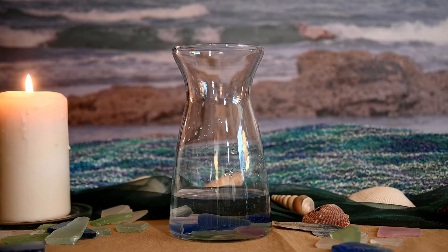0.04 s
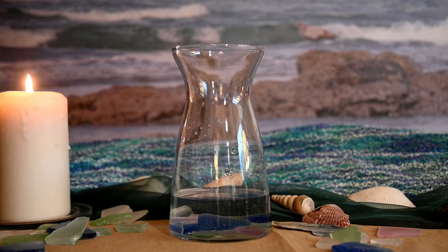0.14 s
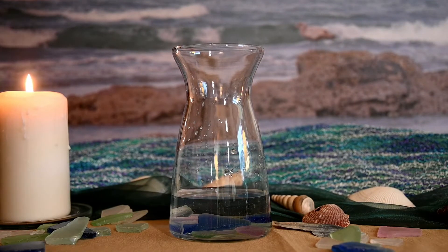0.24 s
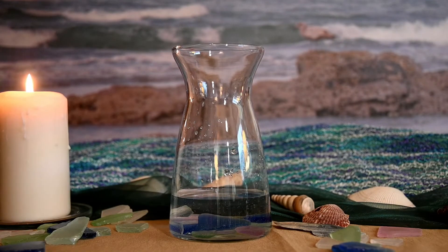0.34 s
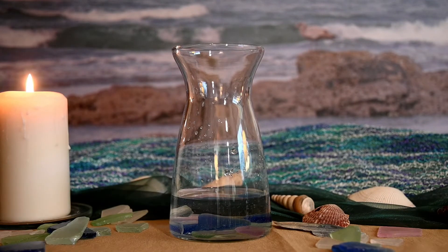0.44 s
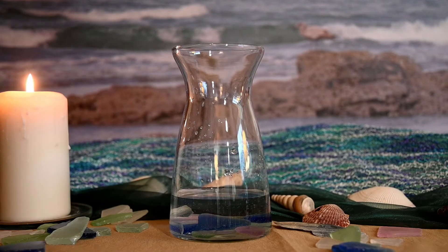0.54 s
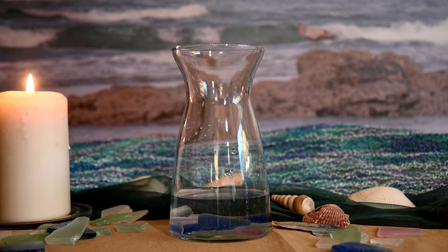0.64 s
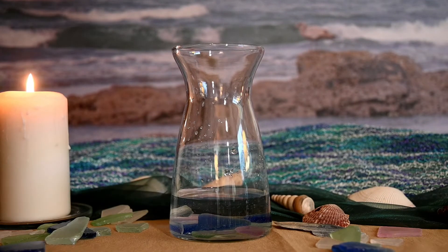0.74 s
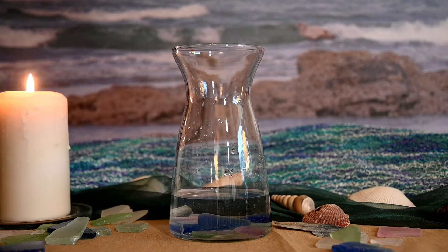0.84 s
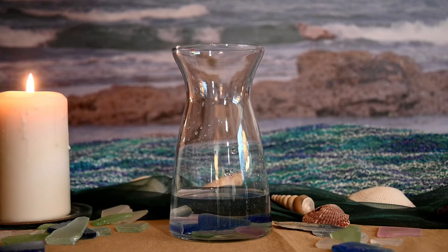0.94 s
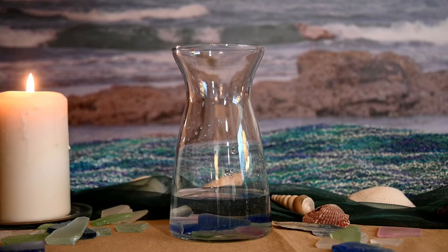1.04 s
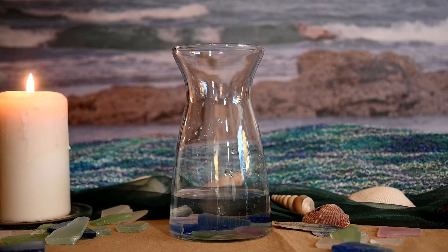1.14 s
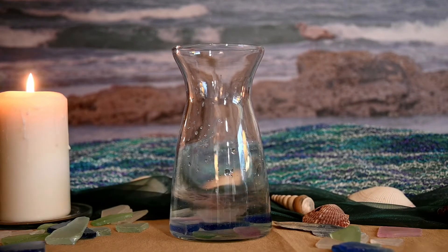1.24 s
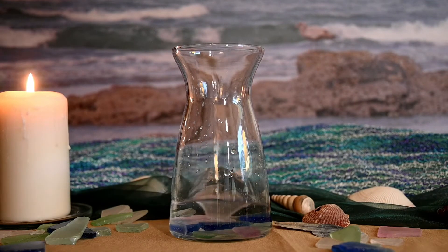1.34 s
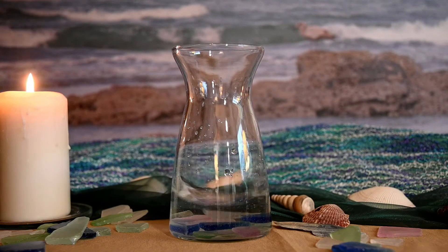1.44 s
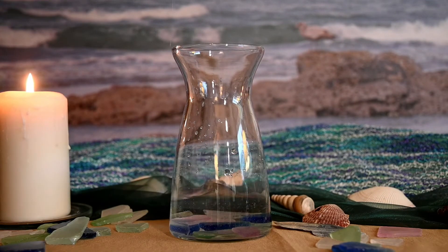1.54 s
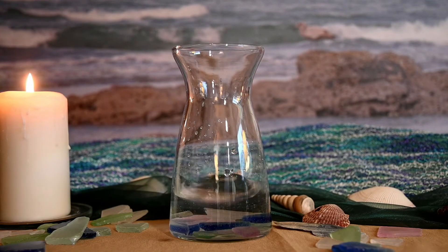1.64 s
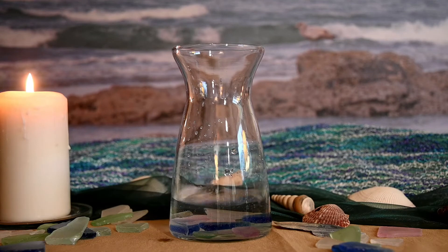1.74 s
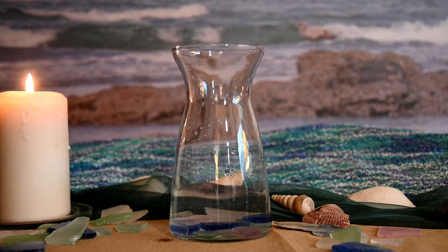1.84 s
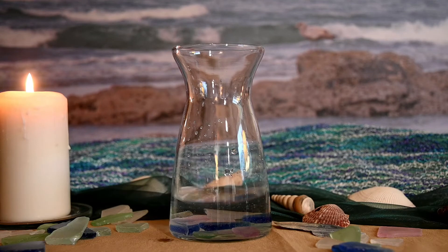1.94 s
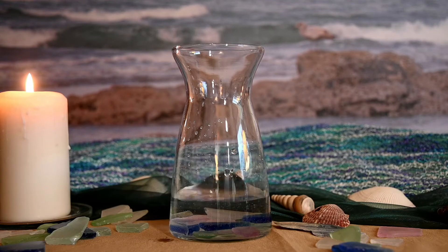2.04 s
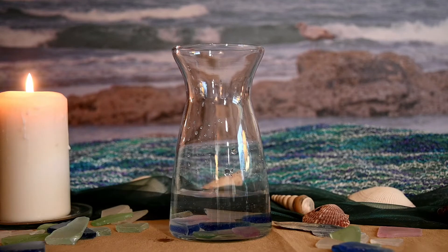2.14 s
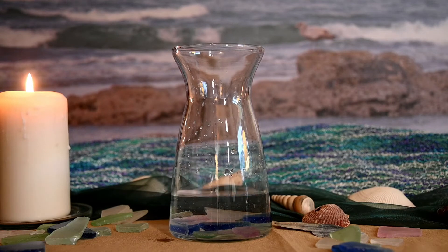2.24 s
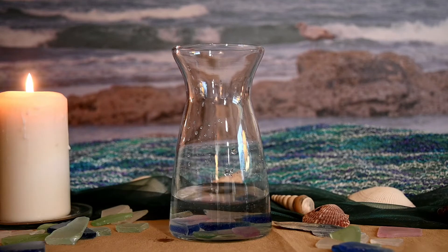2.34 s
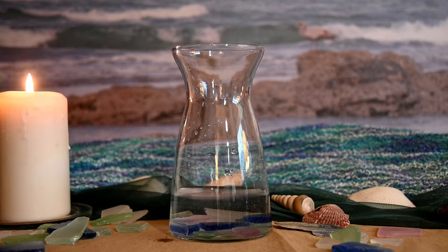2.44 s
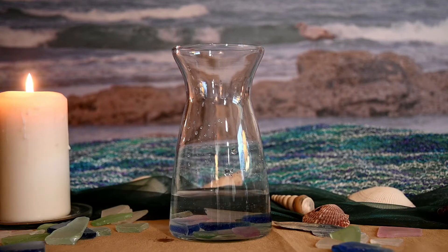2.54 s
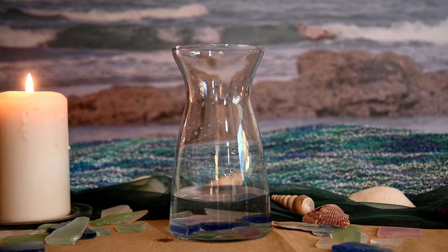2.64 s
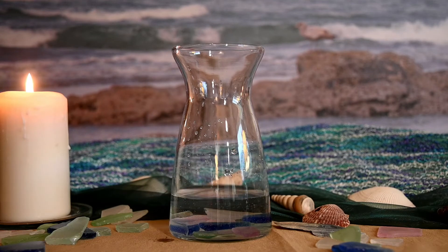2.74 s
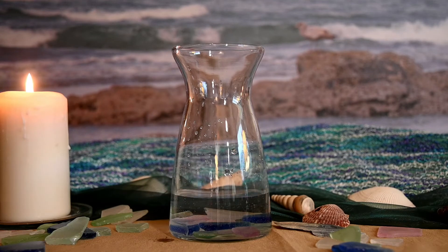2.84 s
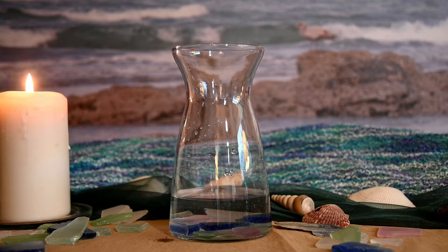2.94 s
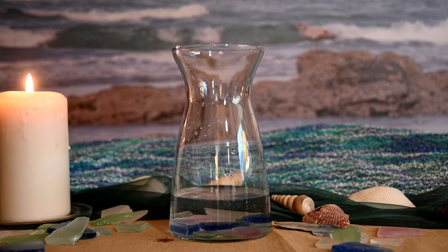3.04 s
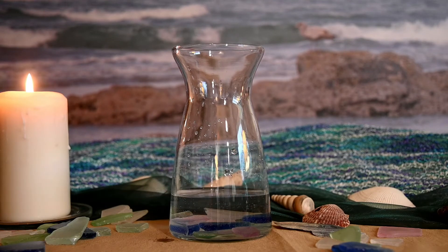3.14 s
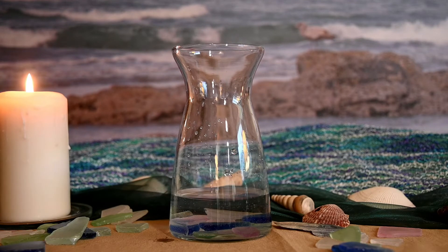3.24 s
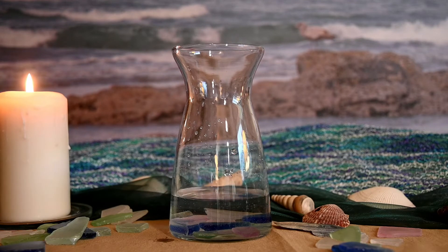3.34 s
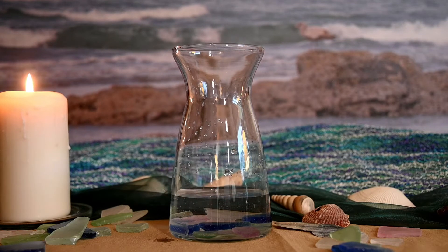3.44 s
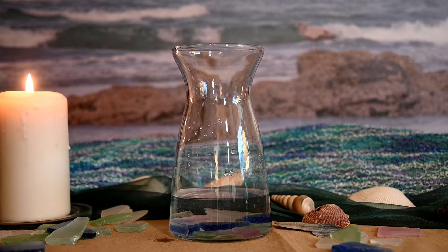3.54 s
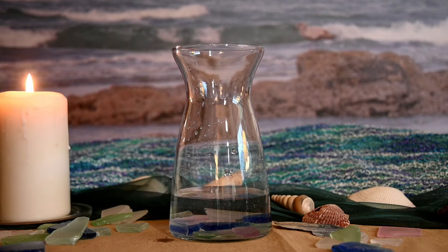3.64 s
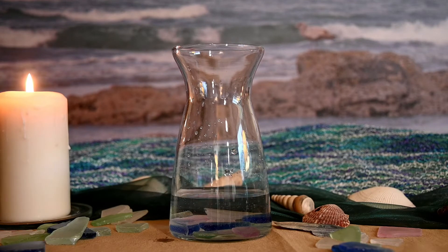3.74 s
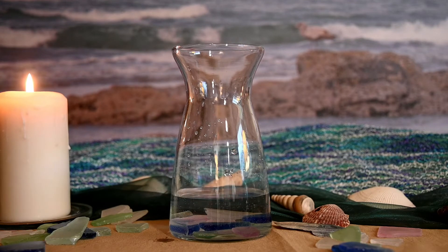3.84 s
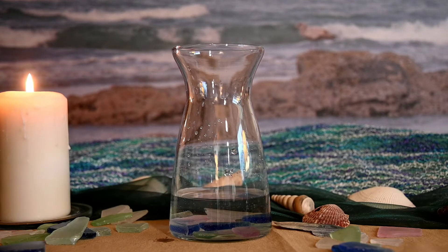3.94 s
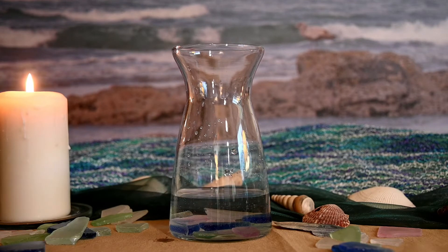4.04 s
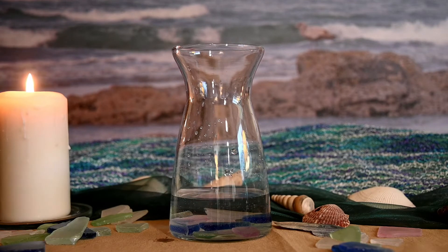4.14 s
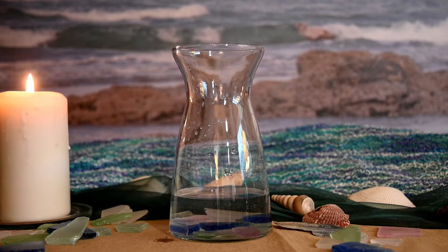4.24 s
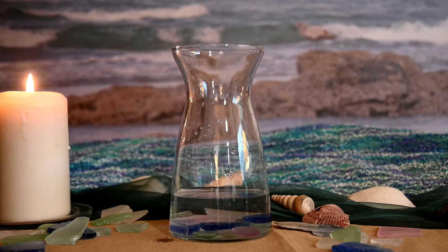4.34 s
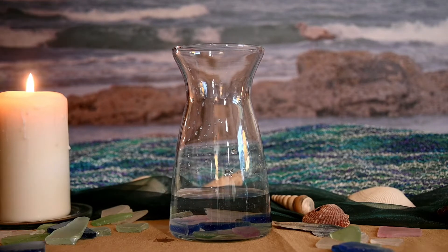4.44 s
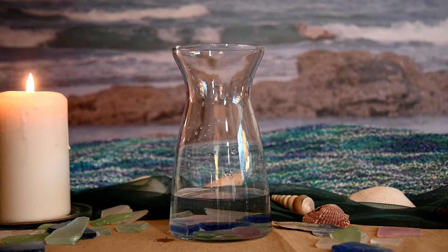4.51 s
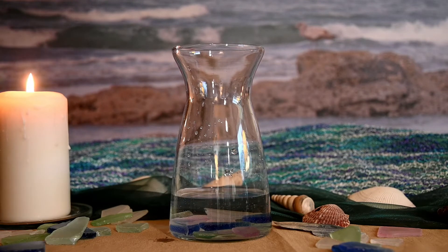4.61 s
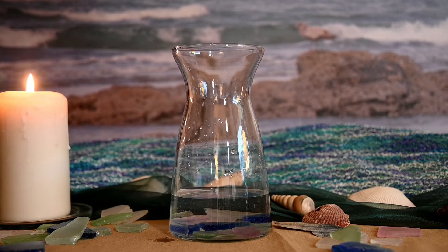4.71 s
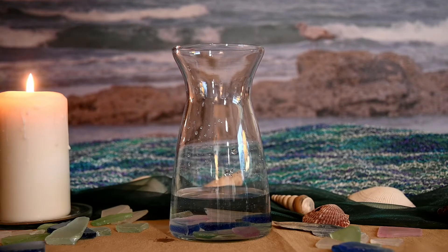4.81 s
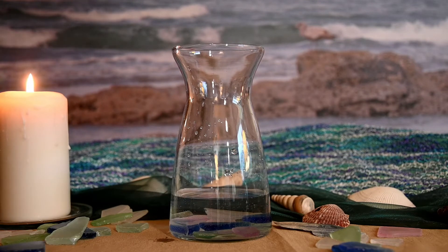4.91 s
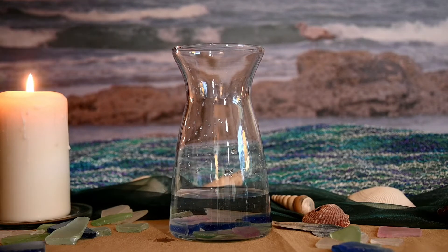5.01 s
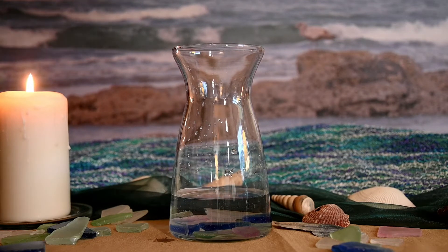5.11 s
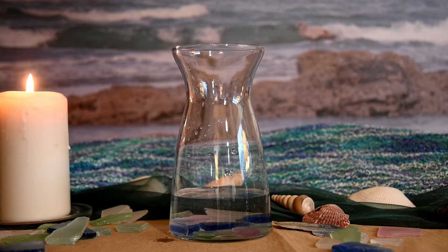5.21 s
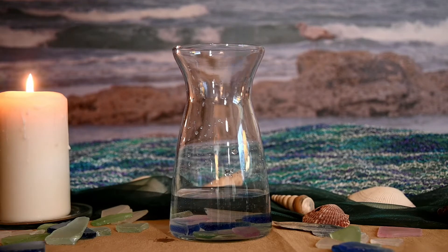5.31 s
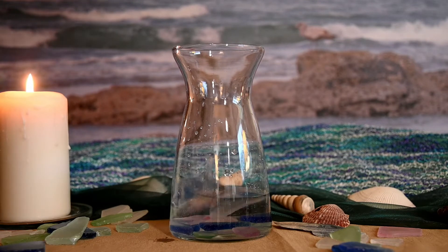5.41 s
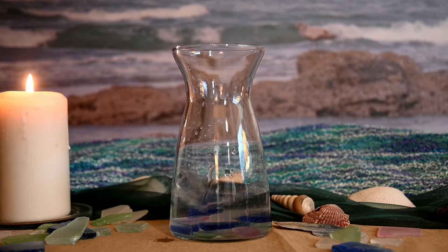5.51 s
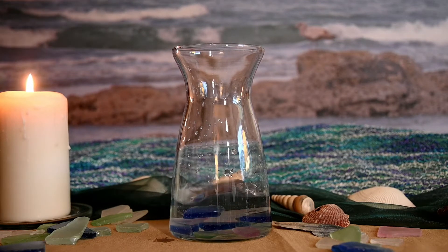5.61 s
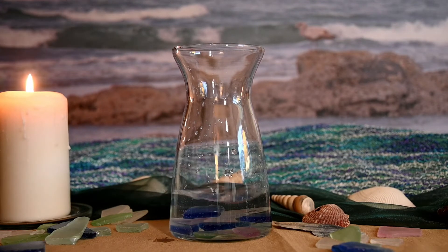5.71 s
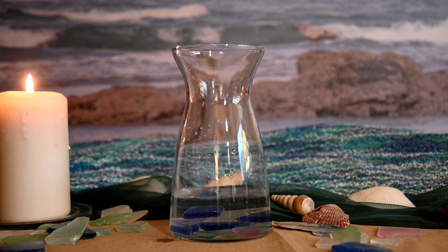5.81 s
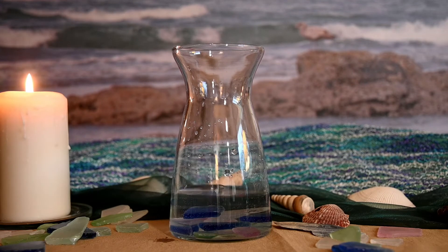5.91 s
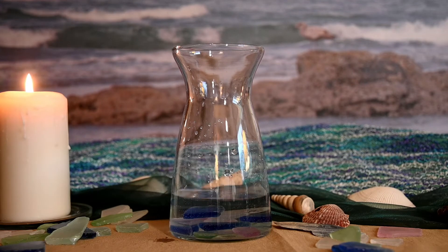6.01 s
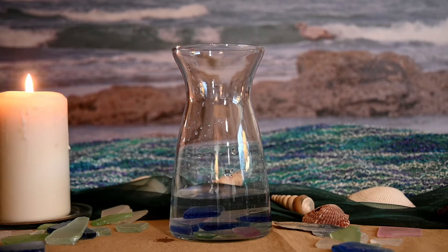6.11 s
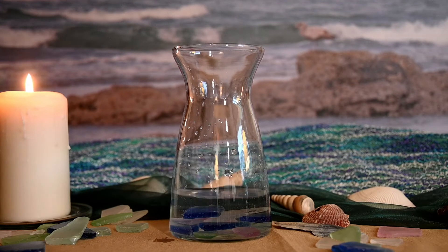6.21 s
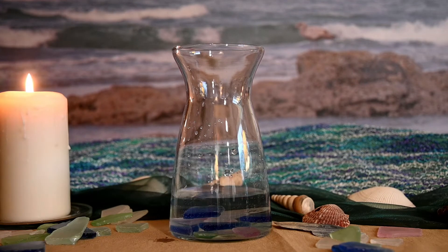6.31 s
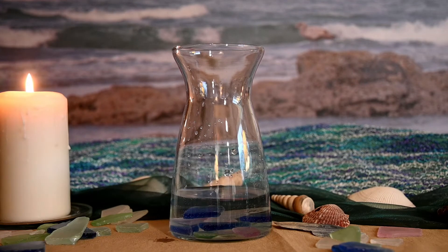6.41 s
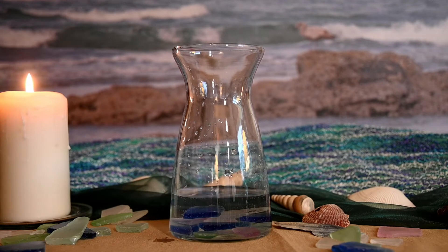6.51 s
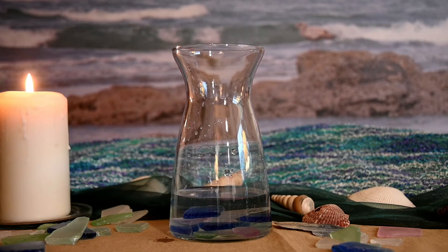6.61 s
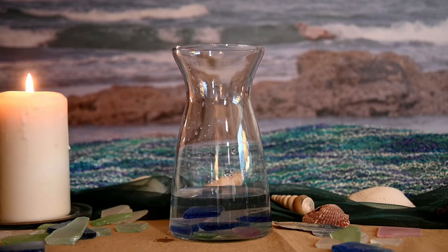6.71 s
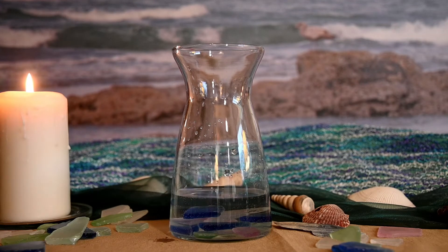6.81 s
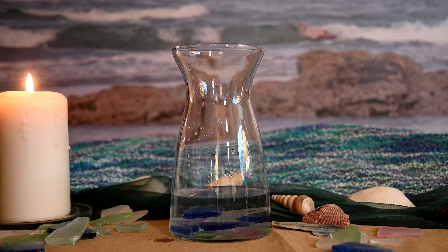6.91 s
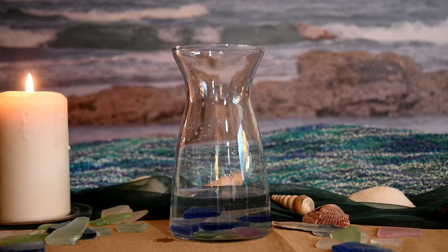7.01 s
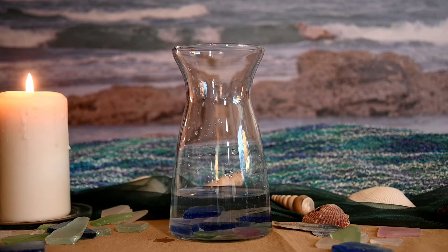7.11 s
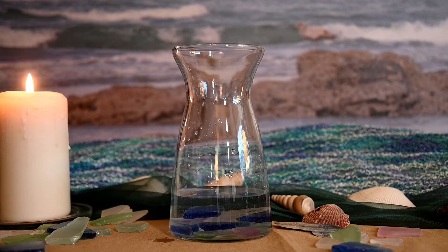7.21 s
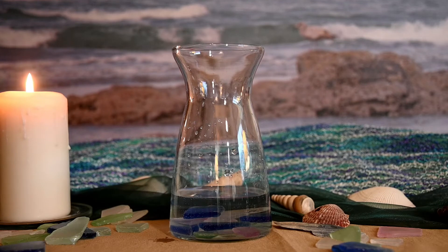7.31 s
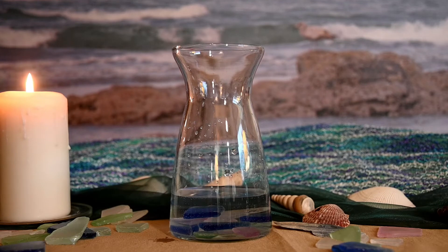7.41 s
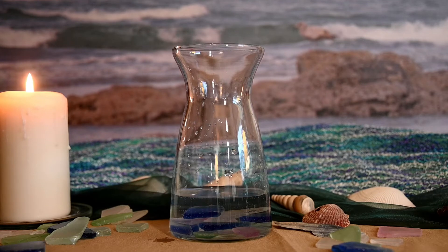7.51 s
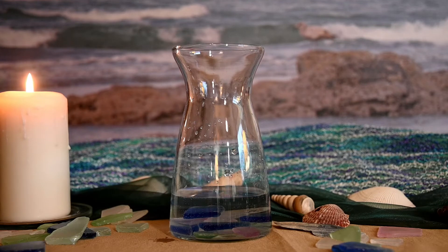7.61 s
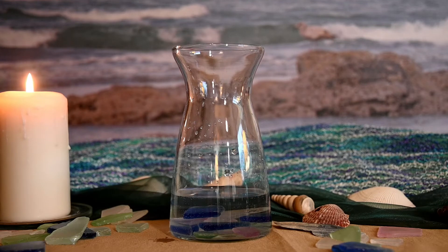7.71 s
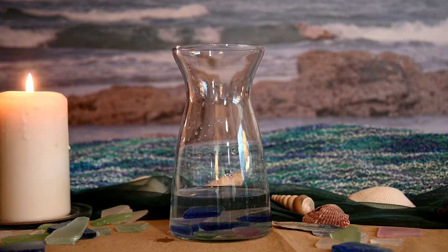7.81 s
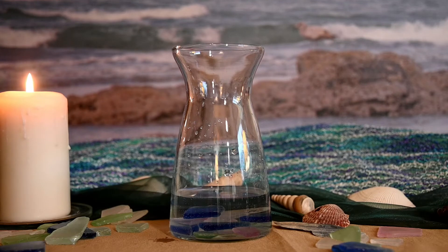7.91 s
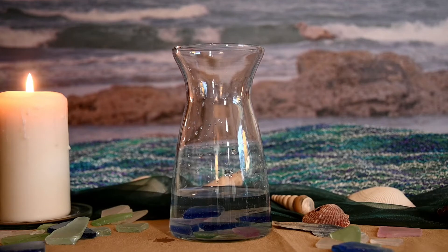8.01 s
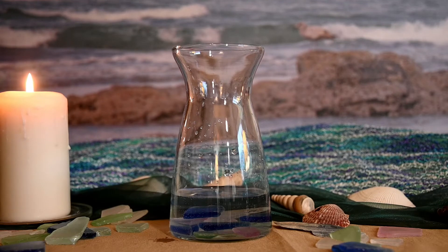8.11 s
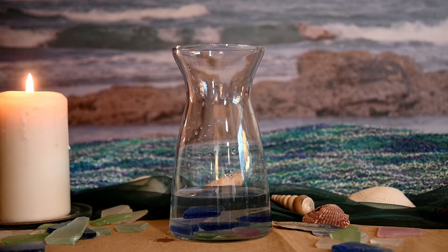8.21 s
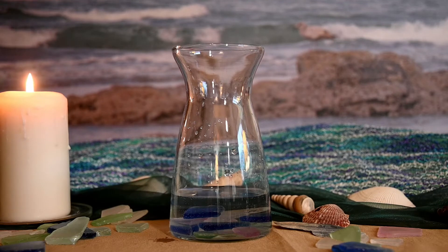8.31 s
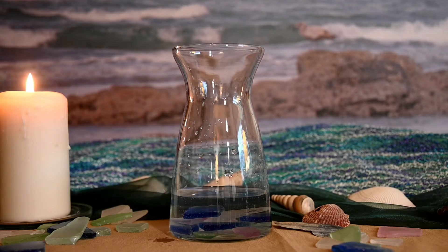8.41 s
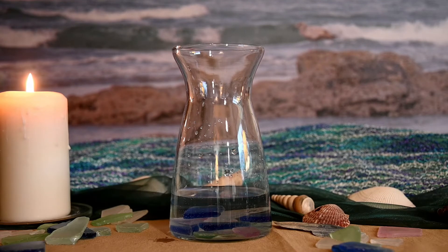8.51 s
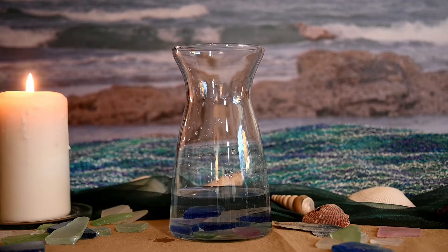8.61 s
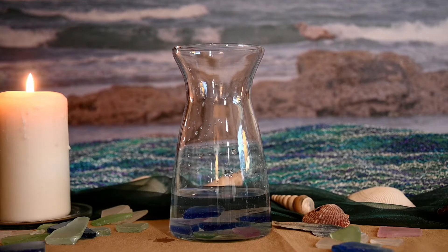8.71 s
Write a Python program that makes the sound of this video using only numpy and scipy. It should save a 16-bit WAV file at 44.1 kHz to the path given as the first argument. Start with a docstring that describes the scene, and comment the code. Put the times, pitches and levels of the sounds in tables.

```python
"""A quiet room hums under a thin hiss and a soft sleeve rustle; then sea glass drops into a glass carafe,
and later a second piece does. Each drop is a flurry of blows: decaying sines ring wall and air, and noise
bursts make ticks and thumps. Bubbles in a little water and small nudges of the settling piece follow.
In between and after, fingers handle a loose pile on the left: short bursts click, grainy noise scrapes."""
import sys
import numpy as np
from scipy import signal
from scipy.fft import rfft, irfft
from scipy.io import wavfile

SR = 44100
rng = np.random.default_rng(int(sys.argv[2]) if len(sys.argv) > 2 else 0)


def transcribe(signal):
    """Save signal, clipped to [-1, 1], as a 16-bit WAV file at the path in sys.argv[1]."""
    frames = np.atleast_2d(signal).T
    limited = np.clip(frames, -1, 1)
    pcm = np.round(limited * 32767).astype(np.int16)
    wavfile.write(sys.argv[1], SR, pcm)


N = 385875  # length in samples
TOP_HZ = 16500  # upper limit of the sound
AGE = np.arange(SR // 2) / SR  # seconds since a sound began, up to half a second

# Tone of glass touching the carafe. Each row: frequency in Hz, relative level in dB.
TICK_COLOUR = [(60, -42.5), (350, -12), (900, -12), (1700, -6), (3500, -12.5), (5200, 5.5), (7000, -3),
               (10500, -5.5), (12000, -16.5), (16000, -15.5)]
# Tone of loose pieces touching each other. Each row: frequency in Hz, relative level in dB.
PIECE_COLOUR = [(200, -41), (1500, -8.5), (2300, -8), (3600, 2.5), (4500, 2.5), (6500, 2.5), (9000, 4),
                (11500, 1.5), (14500, -9.5), (16500, 0)]


def undb(db):
    """Turn decibels into a gain."""
    return 10 ** (np.asarray(db) / 20)


def fade(t60):
    """Die away exponentially, by 60 dB in t60 seconds."""
    return np.exp(-np.log(1000) * AGE / max(t60, 1 / SR))


def add(out, s, sound):
    """Mix a sound in at time s, in seconds."""
    i = int(s * SR)
    out[:, i:i + sound.shape[-1]] += sound[..., :N - i]


def pan(db):
    """Give the gains of both channels for a left-minus-right level in dB."""
    return undb([[db / 2], [-db / 2]])


def between(ends, share):
    """Give the value a share of the way from one end to the other."""
    return ends[0] + np.clip(share, 0, 1) * (ends[1] - ends[0])


def colour(x, points, tilt_db=0):
    """Filter through (Hz, dB) points, without sound ahead of the input, keeping the power of white noise."""
    size = 2048 if x.shape[-1] < N else 16384
    octave = np.log2(np.maximum(np.fft.rfftfreq(size, 1 / SR), 1))
    hz, db = np.transpose(points)
    # the tilt is in dB per octave above 1024 Hz
    level_db = np.interp(octave, np.log2(hz), db) + tilt_db * np.maximum(octave - 10, 0)
    gain = undb(level_db)
    # folding the cepstrum forward gives a filter that responds as early as it can
    cepstrum = irfft(np.log(gain / np.sqrt(np.mean(gain ** 2))))
    cepstrum[1:size // 2] *= 2
    cepstrum[size // 2 + 1:] = 0
    response = irfft(np.exp(rfft(cepstrum)))
    return signal.fftconvolve(x, response[None], axes=1)[:, :x.shape[-1]]


def noise(size, likeness):
    """Make stereo white noise; likeness is the correlation between the channels."""
    mid, side = rng.standard_normal((2, size))
    c = np.clip(likeness, -1, 1)
    return np.sqrt((1 + c) / 2) * mid + np.sqrt((1 - c) / 2) * np.array([side, -side])


def burst(t60, likeness, snap):
    """Make one sharp contact, then fast-dying chatter; a larger snap favours the contact at equal energy."""
    x = noise(len(AGE), likeness) * fade(t60)
    x[:, 0] = snap
    return x * np.sqrt(np.sum(fade(t60) ** 2) / np.sum(x ** 2, axis=1, keepdims=True))


def ring(hz, t60, spread):
    """Ring one mode, which reaches the two microphones with slightly different phases."""
    offset = spread * rng.uniform(-1, 1) * np.array([[1], [-1]])
    return np.sin(2 * np.pi * hz * AGE + offset) * fade(t60)


def band(hz, width_hz):
    """Make stereo noise in a cluster of close resonances, at unit level."""
    centre_hz = min(hz, SR * .45)
    peak = signal.iirpeak(centre_hz, hz / width_hz, fs=SR)
    x = signal.lfilter(*peak, noise(len(AGE), likeness=.4))
    x = signal.lfilter(*peak, x)  # twice, for steeper sides
    return x / np.std(x)


def from_left(x, count=5):
    """Delay the right channel by count samples, as for sound coming from the left."""
    return np.array([x[0], np.roll(x[1], count)])


def background():
    """A low ventilation hum, alike on both sides, under a thin hiss: both are coloured noise."""
    # Tone of the hum. Each row: frequency in Hz, relative level in dB.
    hum_colour = [(12, -30.5), (20, -6), (43, -6.5), (75, -19), (92, -6.5), (145, -2.5), (160, -2.5),
                  (177, -17), (201, -11), (222, -17), (248, -12.5), (307, -18), (380, -15), (400, -18),
                  (520, -45.5), (880, -120)]
    # Tone of the hiss. Each row: frequency in Hz, relative level in dB.
    hiss_colour = [(240, -25), (400, -9), (512, -3.5), (553, 0), (666, -13.5), (826, -6), (964, -11),
                   (1600, -8), (1870, -10), (7750, -28.5), (16000, -35.5)]
    hum = colour(noise(N, likeness=.96), hum_colour)
    hiss = colour(noise(N, likeness=0.47), hiss_colour)
    return undb(-55) * hum + undb(-64) * hiss


def hand(flutter_db=2):
    """Cloth noise from the sleeve swells with each reach, and the hand makes soft bumps."""
    # Tone of the sleeve. Each row: frequency in Hz, relative level in dB.
    sleeve_colour = [(100, -10), (300, -1.5), (800, -1.5), (1500, -5.5), (3000, -10.5), (5500, -12),
                     (9000, -23), (16000, -23)]
    # The sleeve brushing as the arm moves. Each row: start in seconds, end in seconds, level in dB.
    reaches = [(1.55, 2.276, -56), (2.575, 3.3, -55.5), (3.204, 4.15, -59), (5.69, 6.252, -61),
               (6.127, 6.522, -56), (6.432, 7.695, -59.5)]
    # Soft bumps of the hand. Each row: start in seconds, level in dB, time to fade by 60 dB in seconds.
    bumps = [(1.6612, -34, 0.022), (1.667, -44.5, 0.15), (5.828, -39, 0.0067), (7.908, -52, 0.037)]
    # Tone of a bump. Each row: frequency in Hz, relative level in dB.
    bump_colour = [(100, -18), (400, -8.5), (850, 3), (1400, 0), (2300, -1.5), (3800, -9.5), (6000, -24),
                   (12000, -34)]
    rise_s, fall_s, resting_db = 0.16, 0.16, -63.5
    t = np.arange(N) / SR
    flutter = np.interp(t, np.linspace(0, t[-1], num=200), rng.standard_normal(size=200))
    power = undb(resting_db) ** 2
    for start, end, db in reaches:
        swell = np.clip(np.minimum((t - start) / rise_s, (end - t) / fall_s), 0, 1)
        power = power + (undb(db) * swell) ** 2
    out = colour(noise(N, likeness=0.37), sleeve_colour) * np.sqrt(power) * undb(flutter_db * flutter)
    for s, db, t60 in bumps:
        add(out, s, undb(db) * colour(burst(t60, likeness=0.25, snap=2.5), bump_colour))
    return out


def shimmer(count=520, t60=.16, treble_hz=17000):
    """Ring each of the wall's weak, closely spaced modes; the high ones die sooner."""
    edges = np.linspace(900, TOP_HZ, count + 1)
    return np.array([ring(hz, t60 / (1 + (hz / treble_hz) ** 2), spread=min(hz / 4500, 1.2))
                     for hz in rng.uniform(edges[:-1], edges[1:])], dtype=np.float32)


def touch(weak, tilt_db):
    """Mix the wall's weak modes with random weights, since every point of contact excites them differently."""
    # Tone of the many weak modes. Each row: frequency in Hz, relative level in dB.
    dense_colour = [(1000, -17), (1600, -14), (2900, 3.5), (4000, -0.5), (5400, -2), (7000, -3.5),
                    (8500, -6.5), (10000, -15.5), (13500, -18.5), (15500, -22)]
    weights = (rng.standard_normal(len(weak)) * np.sqrt(2 / len(weak))).astype(np.float32)
    return colour(np.tensordot(weights, weak, 1), dense_colour, tilt_db)


def shard(hz, t60=0.082, damping=1):
    """A free piece rings in a narrow cluster; higher ones die sooner (t60 is for 8 kHz)."""
    return band(hz, width_hz=420) * fade(t60 * (8000 / hz) ** damping)


def carafe(weak, air_hz=512, air_t60=0.14, air_rise=0.008, thump_t60=.16):
    """Each blow ticks, rings wall and piece, and shakes the table; the air inside swells a moment later."""
    # Main modes of the wall. Each row: frequency in Hz, relative level in dB when struck at the neck,
    # the same when struck at the base, time to fade by 60 dB in seconds.
    wall_modes = [(1856, -46, -33, .15), (2168, -46, -31, .15), (3009, -44, -28, .12),
                  (3326, -48, -29, .14), (3472, -46, -32, .18), (3666, -42, -29, .16),
                  (4370, -37, -35, .16), (4633, -34, -31, .15), (4684, -33, -29, .15),
                  (5060, -25, -31, .17), (5230, -22, -34, .15), (5338, -23, -30, .16),
                  (5376, -19, -24, .17), (5448, -25, -33, .15), (5850, -38, -31, .16), (6915, -14, -34, .1),
                  (8230, -28, -35, .1), (8990, -33, -39, .12), (9723, -23, -46, .13),
                  (13330, -29, -52, .14), (14770, -32, -50, .12)]
    # The two halves of the split bell tone. Each row: frequency in Hz, time to fade by 60 dB in seconds.
    bell_pair = [(2702, .21), (2761, .16)]
    # Blows on the carafe. Each row: start in seconds, strength in dB, place from 0 neck to 1 base,
    # contact from 0 corner to 1 flat face, weight in dB, wanted bell tone in Hz (the nearer half sounds),
    # the piece's own ring in Hz, level of that ring in dB relative to the strength.
    blows = [(1.1808, -4, 1, 1, -37.5, 2762, 4640, -21.5), (1.1872, -14.5, .4, 1, -31, 2762, 12000, -6.5),
             (1.191, -16.5, .7, 0.18, -24, 2762, 12100, -19.5),
             (1.197, -20, .65, 0.25, -8, 2762, 15300, -16), (1.2097, -2, .85, 0.49, -23, 2702, 8700, -26.5),
             (1.3795, -22.5, .8, 0.73, -22.5, 2762, 5800, -22), (1.46, -24, .9, 0.6, -21, 2762, 8120, -21),
             (5.3309, -3.5, .02, .02, -16, 2762, 5300, -13), (5.3875, -3.5, 1, 1, -1.5, 2762, 7800, -34.5),
             (5.544, -28, .45, 1, -9, 2762, 8200, -12), (5.552, -30, .8, 1, -15, 2762, 3740, -16),
             (5.579, -40, 0.6, 1, -3, 2762, 5870, -3)]
    # Tone of the thump through the table. Each row: frequency in Hz, relative level in dB.
    thump_colour = [(40, -28), (100, -11), (150, 1), (200, -2.5), (260, -3.5), (350, -11.5), (700, -16),
                    (1500, -34), (4000, -47)]
    # what a blow of strength 0 dB excites: (dB for a corner, dB for a flat face)
    wall_db, bell_db, tick_db, dense_db = (0.5, -4.5), (-14.5, -14), (0, -15.5), (-27, -18)
    dense_tilt_db = (-4, -1.5)  # per octave: (corner, flat face)
    air_db, thump_db = -12, -21  # at weight 0 dB
    air_per_weight, bell_per_weight = .55, .17  # dB for each dB of weight; the thump follows it fully
    # softer and heavier blows press longer: dB per octave of treble lost for each dB
    soft_dulling, heavy_dulling = .13, 0.12
    out = np.zeros((2, N))
    for s, db, place, flat, weight_db, bell_hz, piece_hz, piece_db in blows:
        wall = sum(undb(between((neck_db, base_db), place)) * ring(hz, t60, spread=min(hz / 5500, 1.2))
                   for hz, neck_db, base_db, t60 in wall_modes)
        # the side that is struck decides which half of the bell pair speaks
        half_hz, half_t60 = min(bell_pair, key=lambda mode: abs(mode[0] - bell_hz))
        bell = undb(bell_per_weight * weight_db) * ring(half_hz, half_t60, spread=0.39)
        tilt_db = soft_dulling * db - heavy_dulling * weight_db
        tick = colour(burst(t60=0.008, likeness=0.53, snap=8.1), TICK_COLOUR, tilt_db)
        dense = touch(weak, tilt_db + between(dense_tilt_db, flat))
        glass = sum(undb(between(ends, flat)) * part
                    for ends, part in [(wall_db, wall), (bell_db, bell), (tick_db, tick), (dense_db, dense)])
        air = ring(air_hz, air_t60, spread=.1) * (1 - np.exp(-AGE / air_rise))
        thump = colour(noise(len(AGE), likeness=1.0) * fade(thump_t60), thump_colour)
        bass = undb(air_db + air_per_weight * weight_db) * air + undb(thump_db + weight_db) * thump
        add(out, s, undb(db) * (glass + bass + undb(piece_db) * shard(piece_hz)))
    return out * pan(db=-0.7)


def water(glide=0.2):
    """Air dragged under by a piece rings as a bubble, rising in pitch as it nears the surface."""
    # Bubbles. Each row: start in seconds, first pitch in Hz, level in dB, time to fade by 60 dB in seconds.
    bubbles = [(1.22, 1170, -22.5, 0.014), (1.392, 2807, -36.5, 0.048), (5.4653, 1168, -35, 0.11),
               (5.4890, 1150, -39, 0.031), (5.5660, 2860, -37, 0.091)]
    out = np.zeros((2, N))
    for s, hz, db, t60 in bubbles:
        # the pitch climbs by twice the glide, as a share of the first pitch, each second
        add(out, s, undb(db) * np.sin(2 * np.pi * hz * AGE * (1 + glide * AGE)) * fade(t60))
    return out


def settling(weak, count=6, jitter_s=0.0027, wall_db=-3, piece_db=-2, tick_db=2, tilt_db=4):
    """A sunken piece rocks in a few ever softer nudges that ring it and, faintly, the wall."""
    # Pieces rocking to rest. Each row: start in seconds, end in seconds, level at first in dB.
    rockings = [(1.298, 1.375, -46), (5.4733, 5.62, -41)]
    db_per_s, ring_hz, spread_oct = -25, 8400, 0.2
    out = np.zeros((2, N))
    for start, end, db in rockings:
        for s in np.linspace(start, end, count + 1)[:-1]:
            late, pitch = rng.uniform(-1, 1, 2)
            wall = touch(weak, tilt_db)
            piece = shard(ring_hz * 2 ** (spread_oct * pitch))
            tick = colour(burst(t60=0.006, likeness=0.53, snap=10), TICK_COLOUR)
            nudge = undb(wall_db) * wall + undb(piece_db) * piece + undb(tick_db) * tick
            add(out, s + jitter_s * late, undb(db + db_per_s * (s - start)) * nudge)
    return out


def scrapes(grain_db=14, wobble_db=2, taper=0.43, size=12):
    """Frosted faces slip under wavering pressure, in dense grains that ring the pieces; edges catch at times."""
    # Pieces sliding over the pile. Each row: start in seconds, end in seconds, level in dB, ring in Hz.
    slides = [(2.374, 2.705, -50.5, 15000), (2.509, 2.599, -47.5, 2350), (2.752, 2.85, -57, 7340),
              (2.832, 2.921, -50.5, 6050), (2.93, 3.004, -58.5, 5900), (3.047, 3.296, -60.5, 6400),
              (3.249, 3.31, -55, 4800), (3.309, 3.49, -61, 6150), (5.748, 6.193, -63, 15000),
              (6.486, 6.61, -56, 15500), (6.6, 6.744, -60, 15200), (6.83, 6.994, -53, 14800),
              (7.154, 7.548, -54.5, 16000)]
    # Tone of a rubbed piece. Each row: frequency in Hz, relative level in dB.
    rub_colour = [(300, -14.5), (1500, -2.5), (2300, 1.5), (3600, 2), (4600, 5), (6000, 1), (9000, -7),
                  (12000, -12.5), (16000, -5.5)]
    base_ring_db, ring_db_per_oct = -1.5, -6.5  # ring against rub up to 6 kHz; higher rings are weaker
    # edges catching: average rate, the loudest over the rub before colouring, and how much softer they get
    catches_per_s, catch_db, catch_range_db = 60, 23, 18
    grain = 96  # samples
    out = np.zeros((2, N))
    for start, end, db, ring_hz in slides:
        stroke = signal.windows.tukey(int(np.clip((end - start) * SR, 2, len(AGE))), taper)
        wobble = np.interp(AGE, np.linspace(0, AGE[-1], size), rng.standard_normal(size))
        pressure = undb(wobble_db * wobble)
        grains = np.repeat(undb(grain_db * rng.random(len(AGE) // grain + 1)), grain)[:len(AGE)]
        grains = grains / np.sqrt(np.mean(grains ** 2))
        ring_db = base_ring_db + ring_db_per_oct * max(np.log2(ring_hz / 6000), 0)
        rub = colour(noise(len(AGE), likeness=0.54), rub_colour)
        rub = rub + undb(ring_db) * band(ring_hz, width_hz=1300)
        chance, softness = rng.random((2, len(AGE)))
        catches = (chance < catches_per_s / SR) * undb(catch_db - catch_range_db * softness)
        sound = pressure * (rub * grains + colour(catches[None], PIECE_COLOUR))
        add(out, start, undb(db) * sound[:, :len(stroke)] * stroke)
    return out * pan(db=3.5)


def piece_ring(hz, t60, width_hz, count=6):
    """Ring a few neighbouring modes of an irregular shard, equally strong on both sides."""
    modes = hz + width_hz * (np.arange(count) + rng.random(count) - count / 2) / count
    x = sum(ring(f, t60, spread=0.57) for f in modes)
    return x * np.sqrt(np.sum(fade(t60) ** 2) / (2 * np.sum(x ** 2, axis=1, keepdims=True)))


def pile(piece_t60=0.01, width_hz=1700):
    """Pieces damped by fingers click dryly, ring very briefly and sometimes knock on the table."""
    # Loose pieces clicking together. Each row: start in seconds, level in dB, time for the contact to fade
    # by 60 dB in seconds, the piece's own ring in Hz, level of that ring in dB relative to the click.
    touches = [(2.44, -46, .015, 12800, -5), (2.484, -47, .012, 5500, 4), (2.5127, -34, 0.013, 15000, -8),
               (2.535, -22, .025, 14300, 6), (2.5678, -21.5, 0.0047, 12600, 4.5),
               (2.587, -30.5, .036, 15900, 6), (2.6922, -39, 0.0074, 15000, -6),
               (2.734, -35.5, 0.016, 15500, -14), (2.973, -45.5, .028, 5830, 13),
               (3.1376, -34, .02, 6400, 12), (3.2683, -32.5, .014, 6000, -10),
               (3.2847, -30, 0.014, 5570, 2), (3.3129, -10, 0.0049, 15000, 0.5),
               (3.34, -31, 0.013, 14850, -8), (3.4315, -42, .024, 5800, 5), (6.62, -45, 0.013, 8300, -10),
               (6.928, -38, 0.028, 15000, -8), (7.0233, -45, 0.0058, 6000, 5),
               (7.1715, -35, 0.0079, 6000, 4), (7.176, -21.5, 0.011, 8000, -16),
               (7.2006, -9.5, .0012, 9170, -4.5), (7.213, -23, .008, 9700, -1),
               (7.259, -29.5, 0.0065, 9100, 2), (7.2852, -30.5, 0.0063, 15700, -14),
               (7.3743, -32.5, 0.0063, 7400, 0), (7.3932, -34, 0.016, 7700, 0),
               (7.4181, -20, 0.0082, 15500, 4.5), (7.425, -25.5, .014, 12200, 0),
               (7.43, -30, 0.0068, 15400, 8), (7.4399, -23, 0.025, 15700, -2)]
    # Pieces knocking on the table. Each row: start in seconds, level in dB.
    table_knocks = [(3.3127, -21), (6.6253, -45)]
    # Tone of the table. Each row: frequency in Hz, relative level in dB.
    table_colour = [(100, -18), (260, 5.5), (750, -9.5), (1400, 6), (2200, -9.5), (2700, -1), (4000, -2.5),
                    (8000, -38.5)]
    clicks, knocks = np.zeros((2, 2, N))
    for s, db, t60, hz, ring_db in touches:
        contact = colour(burst(t60, likeness=0.26, snap=8.8), PIECE_COLOUR)
        add(clicks, s, undb(db) * (contact + undb(ring_db) * piece_ring(hz, piece_t60, width_hz)))
    for s, db in table_knocks:
        add(knocks, s, undb(db) * colour(burst(t60=0.0068, likeness=0.2, snap=11), table_colour))
    return clicks * pan(db=4.5) + knocks * pan(db=15.5)


def room(x, t60, wet_db):
    """The table top and near walls return a short, faint tail: fading noise convolved with the sound."""
    tail = noise(len(AGE), likeness=0.2) * fade(t60) * (1 - np.exp(-AGE / .004))
    tail /= np.sqrt(np.sum(tail ** 2, axis=1, keepdims=True))
    return x + undb(wet_db) * signal.fftconvolve(x, tail, axes=1)[:, :N]


def scene():
    """Place the carafe near the middle, and the pile, hand and hum off to the left."""
    weak = shimmer()
    surroundings = from_left(background() + hand())
    drops = room(carafe(weak) + water() + settling(weak), t60=0.29, wet_db=-10)
    handling = room(from_left(scrapes() + pile(), count=6), t60=0.11, wet_db=-12.5)
    return surroundings + drops + handling


def record(dry):
    """Clip at full scale, then cut the treble above the top frequency with a steep low-pass."""
    low_pass = signal.ellip(10, .2, 70, TOP_HZ, fs=SR, output="sos")
    return signal.sosfilt(low_pass, np.clip(dry, -1, 1))


dry = scene()
out = record(dry)
transcribe(out)
```